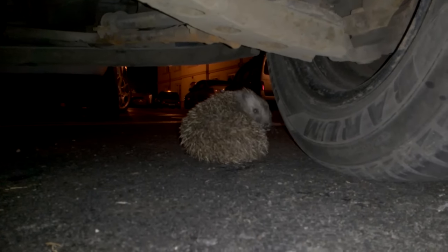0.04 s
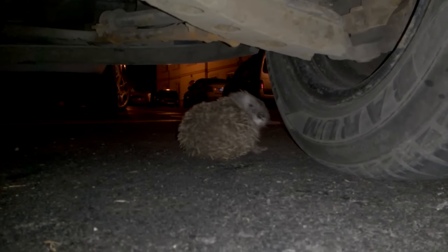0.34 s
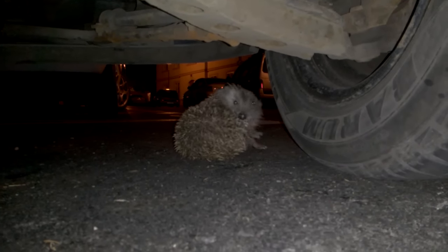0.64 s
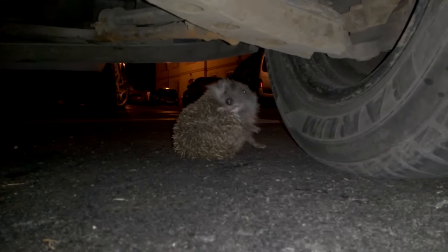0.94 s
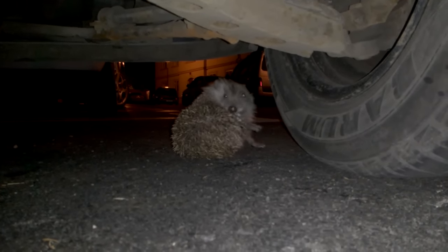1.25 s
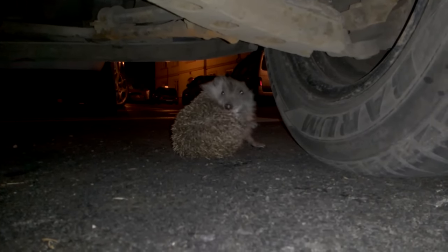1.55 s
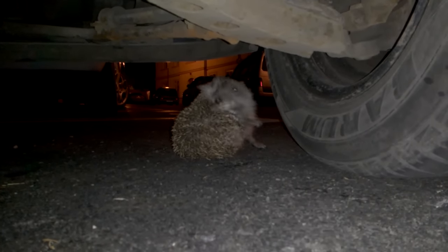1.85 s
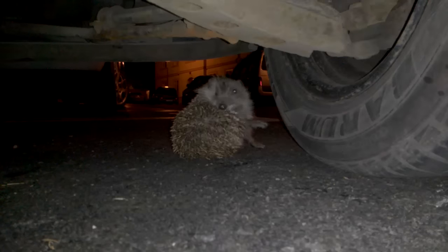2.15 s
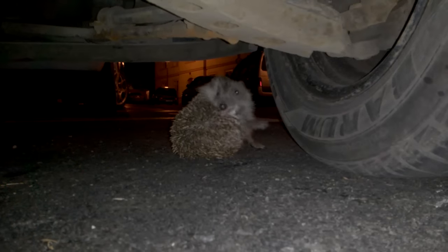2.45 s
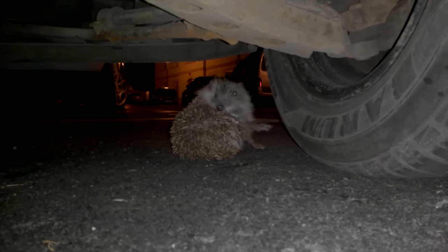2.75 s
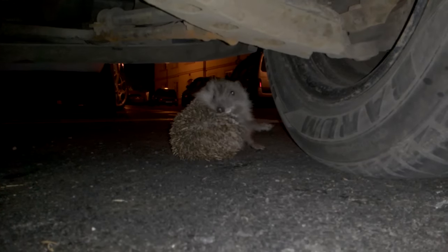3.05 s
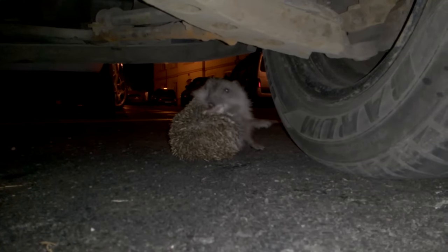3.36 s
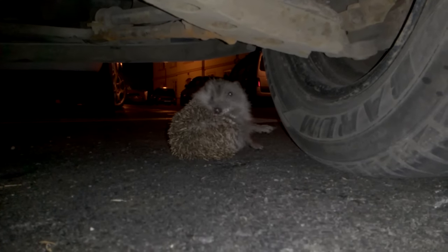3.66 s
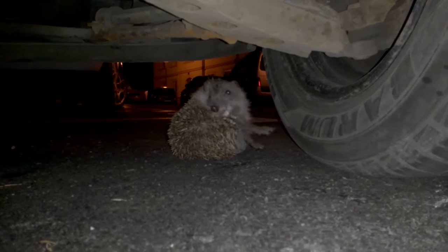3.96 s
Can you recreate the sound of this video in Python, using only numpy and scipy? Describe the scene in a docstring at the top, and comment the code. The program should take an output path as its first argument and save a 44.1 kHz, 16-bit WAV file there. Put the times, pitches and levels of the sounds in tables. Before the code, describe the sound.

A hedgehog smacks its mouth with small wet clicks, over low microphone bumps and rumble.

```python
"""A hedgehog licks and smacks its mouth about twice a second, on asphalt under a parked car at night.
Each wet click rings its tiny mouth for a millisecond and scatters between ground and underbody.
Its tongue squeaks, its spines rustle and its claws scrape. A hand on the microphone adds low bumps,
knocks and rumble, over faint outdoor air, hiss and a far-off hum."""
import sys
import numpy as np
from scipy import signal
from scipy.fft import rfft, irfft
from scipy.io import wavfile
from scipy.ndimage import uniform_filter1d

SR = 44100
rng = np.random.default_rng(int(sys.argv[2]) if len(sys.argv) > 2 else 0)


def waveform_to_disk(signal):
    """Save audio, clipped to [-1, 1], as 16-bit WAV at the path in sys.argv[1]."""
    frames = np.transpose(np.atleast_2d(signal))
    scaled = np.clip(frames, -1, 1) * 32767
    samples = np.round(scaled).astype(np.int16)
    wavfile.write(sys.argv[1], SR, samples)


N = 4 * SR

# Wet clicks. Each row: time in seconds, peak in dB, mouth resonance in Hz, snap trim in dB.
MOUTH_CLICKS = [(0.1186, -42, 5360, -28), (0.2887, -40, 6840, -9), (0.5323, -41.5, 5130, -9),
                (0.656, -43.5, 5690, -26), (0.8068, -44.5, 4830, -12), (0.837, -25.5, 5520, -19),
                (0.9329, -43, 5050, -8), (1.1442, -38, 5670, -27), (1.161, -36, 5420, -32),
                (1.187, -39.5, 6600, -25), (1.2139, -37.5, 5940, -22), (1.306, -42.5, 5750, -29),
                (1.3185, -48, 5700, -24), (1.3357, -35, 5940, -7), (1.3596, -44, 5850, -21),
                (1.667, -48.5, 5540, -28), (1.7892, -33, 5800, -14), (1.8128, -27, 5260, -11),
                (1.834, -35, 5000, -35), (2.1128, -34, 5950, -17), (2.1285, -42, 5360, -26),
                (2.137, -36.5, 5430, -27), (2.2691, -45, 5840.0, -23), (2.2941, -29.5, 5630, -7.5),
                (2.3129, -34, 4580, -37), (2.4476, -43.5, 5450, -12), (2.554, -49, 5400, -15),
                (2.61, -39.5, 5440, -29), (2.7581, -36.5, 6060, -12.5), (2.7776, -30.5, 5350, -9),
                (2.801, -32, 4960, -28), (2.971, -45, 5800, -17), (3.087, -46.5, 5280, -4.5),
                (3.2881, -25.5, 5940, -11.5), (3.308, -39, 5750, -30), (3.5348, -32, 6100, -17),
                (3.6113, -50.5, 5770, -9), (3.6605, -40.5, 5840, -13.5), (3.7888, -37, 4970, -1.5),
                (3.8046, -35.5, 6260, -31), (3.8211, -39, 4400, -22)]
# Hollow pops of the jaw. Each row: time in seconds, peak in dB.
JAW_POPS = [(.838, -55), (1.162, -60.5), (1.214, -54.5), (1.307, -54), (1.337, -59.5), (2.296, -54.5)]
# Thin tongue squeaks. Each row: centre and half length in seconds, level in dB, pitch in Hz.
TONGUE_SQUEAKS = [(0.059, .007, -67, 5180), (1.612, 0.01, -65, 5350), (3.186, 0.0053, -64, 4900),
                  (3.187, 0.007, -63, 8540)]
# Soft licks and brushing spines, then gritty claws.
# Each row: centre and half length in seconds, relative level in dB.
RUSTLES = [(0.105, 0.013, -63), (.205, 0.042, -50.5), (0.265, 0.031, -55), (.34, 0.014, -58.5),
           (.462, .011, -57.5), (0.513, .025, -63.5), (.535, 0.013, -60.5), (0.649, 0.0083, -58.5),
           (0.722, 0.018, -65.5), (0.896, 0.015, -57.5), (0.972, 0.02, -61.5), (1.037, 0.013, -62.5),
           (1.149, 0.024, -65), (1.325, 0.016, -55.5), (1.372, 0.016, -51.5), (1.455, 0.038, -64.5),
           (1.526, 0.0087, -62), (1.61, 0.0043, -65), (1.679, 0.0082, -63.5), (1.847, 0.01, -55.5),
           (1.962, 0.029, -59.5), (2.085, 0.0078, -59.5), (2.132, 0.018, -61.5), (2.325, 0.012, -57),
           (2.41, 0.14, -68), (2.45, 0.0045, -58), (2.812, 0.022, -58), (2.929, 0.031, -64.5),
           (3.135, 0.023, -68), (3.182, 0.012, -64), (3.831, 0.016, -55)]
CLAW_SCRAPES = [(.089, 0.0019, -57), (.118, 0.012, -59.5), (.24, 0.086, -67), (.393, 0.013, -57.5),
                (.463, 0.0098, -60.5), (.52, 0.022, -65.5), (.731, 0.002, -66), (1.345, 0.021, -72)]
# Low bumps on the microphone, then harder knocks on its case.
# Each row: time in seconds, relative level in dB, pitch in Hz.
HAND_BUMPS = [(0.012, -31.5, 89), (0.073, -26, 125), (0.141, -26, 72.4), (0.161, -20.5, 65),
              (0.185, -26, 90), (0.335, -21.5, 72.5), (0.426, -19.5, 109), (0.452, -21.5, 102),
              (0.476, -27, 58.4), (0.513, -22, 83), (0.542, -25, 78), (0.621, -26.5, 124), (0.654, -29, 96),
              (0.735, -19, 83.6), (0.755, -34, 71.6), (1.288, -26, 72), (1.567, -31.5, 87),
              (1.802, -23, 64.5), (2.032, -23.5, 92.5), (2.651, -30, 118), (2.682, -29, 80),
              (2.806, -29.5, 75), (2.828, -26, 70), (2.851, -26, 74), (2.874, -23, 93), (2.955, -23.5, 65),
              (3.017, -30, 74.5), (3.196, -23.5, 64.6), (3.615, -26.5, 79.4), (3.849, -36.5, 76.4),
              (3.888, -26.5, 96), (3.91, -25.5, 119), (3.951, -39, 115), (3.976, -23.5, 100),
              (.919, -29, 105), (1.067, -33.5, 76), (2.326, -36, 68)]
CASE_KNOCKS = [(0.016, -36, 207), (0.042, -41, 270), (0.063, -34.5, 226), (0.091, -38.5, 220),
               (0.256, -33.5, 256), (0.317, -29.5, 264), (0.346, -39, 196), (0.424, -25.5, 194),
               (0.437, -23, 308), (0.45, -23, 267), (0.494, -27, 334), (0.509, -26.5, 276),
               (0.518, -31, 253), (0.544, -31.5, 220), (0.619, -43, 245), (0.632, -31.5, 232),
               (0.731, -31, 230), (0.748, -32, 200), (0.812, -38.5, 201), (1.551, -42, 162),
               (1.792, -31, 220), (2.032, -42, 220), (2.649, -38, 296), (2.663, -30.5, 199),
               (2.688, -37, 218), (2.854, -38.5, 233), (2.875, -36.5, 192), (2.932, -35, 205),
               (2.947, -33, 218), (2.99, -37.5, 208), (3.005, -41.5, 227), (3.887, -28.5, 262),
               (3.907, -29.5, 239), (3.917, -35, 237), (3.951, -31, 213), (3.989, -35.5, 274),
               (.935, -38, 172), (.972, -34, 168), (2.622, -39, 182)]
# The hollow ring of the case. Each row: frequency in Hz, Q, gain in dB.
CASE_MODES = [(251.6, 8.1, -8.5), (390, 12, -9.5), (780, 8.1, 3.5)]
# Rumble faders. Each row: time in seconds, deep band gain in dB, upper band gain in dB.
RUMBLE_FADERS = [(0.04, -46, -49.5), (0.32, -47.5, -55.5), (0.57, -41.5, -49), (1.14, -61.5, -72),
                 (1.33, -55, -65.5), (1.52, -66.5, -76.5), (1.56, -55, -62), (1.74, -51.5, -76),
                 (1.94, -49.5, -61.5), (2.24, -57.5, -71), (2.38, -61, -70), (2.55, -59.5, -84),
                 (2.74, -57.5, -65.5), (2.82, -41.5, -52.5), (3.03, -47, -60.5), (3.16, -47, -63.5),
                 (3.4, -51, -62.5), (3.71, -50, -58.5), (3.95, -39.5, -68)]
# Faders for hiss and hum. Each row: time in seconds, gain in dB.
HISS_FADER = [(0, -79.5), (1.1, -80.5), (1.45, -77), (1.6, -83), (1.77, -84), (1.85, -77.5), (2.15, -75.5),
              (2.68, -80), (2.82, -74.5), (4, -74.5)]
HUM_FADER = [(1.6, -96), (2, -84.5), (4, -90)]
# The tones of the hum, in Hz.
HUM_HZ = [432, 652, 863]
# EQ curves for the noise layers and the stereo side signal. Each row: frequency in Hz, gain in dB.
SNAP_EQ = [(3000, -13), (7200, -14), (8300, 7.5), (9400, 7), (10500, 4), (12000, -8), (14000, -17)]
SMACK_EQ = [(600, -42), (1200, -28), (1900, -22), (2450, -7), (2900, -16.5), (3700, 0), (5400, 2.5),
            (6800, 4), (7600, -0.5), (14000, -23.5)]
RUSTLE_EQ = [(600, -53), (1100, -20), (2300, -19), (2900, -12.5), (3900, -4), (5400, 5.5), (7000, -1),
             (8500, -7), (11000, -24), (14000, -30)]
SCRAPE_EQ = [(700, -8), (1200, -5), (1800, 4.5), (2400, 5.5), (2900, -3.5), (4000, 5), (8000, -42)]
DEEP_RUMBLE_EQ = [(20, -57), (32, -21.5), (52, 3), (75, -4.5), (115, -12), (180, -21.5), (300, -67)]
UPPER_RUMBLE_EQ = [(90, -60), (160, 6), (250, -6.5), (380, -16.5), (520, -27), (750, -36), (1200, -90)]
AIR_EQ = [(100, 13.5), (400, 10), (800, 5.5), (1400, -3.5), (3000, -5), (4200, -5.5), (5400, 5.5),
          (6500, 1), (8000, -0.5), (11000, -3.5), (14000, -11)]
HISS_EQ = [(1000, -2), (5000, -15), (8500, 9.5), (10500, 4.5), (13000, 12)]
SIDE_EQ = [(2000, -47), (3500, -38), (5000, -25.5), (7000, -7), (10000, -3.5), (14000, -7)]

MOUTH_RING_S, JAW_RING_S, JAW_HZ = 0.00023, 0.000291, 2545


def mouth_clicks():
    """Each click rings the mouth and trails three faint, slightly detuned after-ticks; some pop the jaw."""
    out = np.zeros(N)
    for s, db, hz, _ in MOUTH_CLICKS:
        decay_s = MOUTH_RING_S * np.exp(.15 * rng.standard_normal())
        add(out, s - 4 * decay_s, undb(db) * ring(hz, decay_s))
        for delay_s, detune in zip(rng.exponential(.005, size=3), rng.uniform(-1.12, 1, size=3)):
            after_tick = ring(hz * np.exp(.16 * detune), .66 * decay_s)
            add(out, s + delay_s, undb(db - 15) * after_tick)
    for s, db in JAW_POPS:
        add(out, s - 4 * JAW_RING_S, undb(db) * ring(JAW_HZ, JAW_RING_S))
    return out


def ring(hz, decay_s, fall_per_s=110):
    """A cavity rings for a few cycles, falling in pitch and peaking four decay times in."""
    t = np.arange(400) / SR
    pitch = hz * np.exp(-fall_per_s * rng.uniform(.5, 1.5) * (t - 4 * decay_s))
    envelope = (t / decay_s / 4) ** 4 * np.exp(4 - t / decay_s)
    return envelope * np.sin(2 * np.pi * (np.cumsum(pitch) / SR + rng.random()))


def wet_smacks():
    """The saliva film bursts on each click: a bright snap, then a softer wet crackle."""
    snap = bursts([(s, db + trim) for s, db, _, trim in MOUTH_CLICKS], SNAP_EQ, decay_s=.0027)
    smack = bursts([(s, db) for s, db, _, _ in MOUTH_CLICKS], SMACK_EQ, decay_s=.008)
    return undb(-8) * snap + undb(-20) * smack


def tongue_squeaks(width_hz=550):
    """The wet tongue sticks and slips: a narrow rasp around one pitch."""
    out, t = np.zeros(N), np.arange(N) / SR
    rasp = wander(2 * width_hz) + 1j * wander(2 * width_hz)
    for s, half_s, db, hz in TONGUE_SQUEAKS:
        swell = undb(db) * np.exp(-.5 * ((t - s) / half_s) ** 2)
        out += swell * (rasp * np.exp(2j * np.pi * hz * t)).real
    return out


def rustle():
    """Tongue and spines brush in a fine, bright grain."""
    return undb(-1.5) * grains(RUSTLES, RUSTLE_EQ, per_s=2500)


def claw_scrapes():
    """Claws drag over asphalt in a coarser grit."""
    return undb(-4) * grains(CLAW_SCRAPES, SCRAPE_EQ, per_s=600)


def underbody(x, echoes_per_s=3500, near_t60_s=.042, tail_t60_s=.31):
    """Close reflections off asphalt, tyre and car floor, then a weak diffuse tail."""
    t = np.arange(SR // 2) / SR
    echoes = rng.standard_normal(len(t)) * (rng.random(len(t)) < echoes_per_s / SR)
    near = echoes * (t > .0008) * undb(-60 * t / near_t60_s)
    tail = rng.standard_normal(len(t)) * (t > .004) * undb(-60 * t / tail_t60_s)
    response = (undb(-8) * unit(near) + undb(-16.5) * unit(tail)) / np.sqrt(len(t))
    return signal.fftconvolve(x, response)[:N]


def hand_rumble():
    """The hand on the microphone rumbles: a deep bed under a fluttering upper band."""
    deep = noise(DEEP_RUMBLE_EQ) * fader(RUMBLE_FADERS, column=1) * undb(7.5)
    upper = noise(UPPER_RUMBLE_EQ) * fader(RUMBLE_FADERS, column=2) * undb(2 + 2.5 * wander(40))
    return deep + upper


def hand_bumps():
    """The hand bumps the microphone; harder knocks ring its hollow case."""
    knocks = thuds(CASE_KNOCKS, width_octaves=.51)
    case = sum(undb(db) * signal.lfilter(*signal.iirpeak(hz, q, fs=SR), knocks)
               for hz, q, db in CASE_MODES)
    return undb(1) * (thuds(HAND_BUMPS, width_octaves=.55) + knocks + case)


def night_air():
    """Still outdoor air, gently wavering, and the microphone's hiss."""
    air = undb(-70 + wander(7.3)) * noise(AIR_EQ)
    hiss = undb(1.5) * fader(HISS_FADER) * noise(HISS_EQ)
    return air + hiss


def distant_hum():
    """Faint far-off tones, each wavering in level."""
    t = np.arange(N) / SR
    return fader(HUM_FADER) * sum(wander(20) * np.sin(2 * np.pi * hz * t) for hz in HUM_HZ)


def bursts(hits, eq, decay_s):
    """Noise bursts with an instant attack and a fast decay."""
    envelope, fade = np.zeros(N), np.exp(-np.arange(SR // 10) / SR / decay_s)
    for s, db in hits:
        add(envelope, s - 2 * MOUTH_RING_S, undb(db) * fade)
    white = rng.standard_normal(N)
    return equalise(envelope * white, eq) / np.std(equalise(white, eq))


def grains(swells, eq, per_s, spread_db=3.5):
    """Swells of dense, uneven little ticks."""
    t = np.arange(N) / SR
    power = sum(undb(db) ** 2 * np.exp(-((t - s) / half_s) ** 2) for s, half_s, db in swells)
    ticks = (rng.random(N) < per_s / SR) * rng.choice([-1, 1], N)
    accents = undb(spread_db * rng.exponential(size=N).clip(0, 4))
    return np.sqrt(power) * unit(equalise(ticks * accents, eq))


def thuds(hits, width_octaves, size=8192):
    """Soft pushes of a cycle or two, each around its own pitch."""
    out, f = np.zeros(N), np.maximum(np.fft.rfftfreq(size, 1 / SR), 1)
    for s, db, hz in hits:
        spectrum = np.exp(-.5 * (np.log2(f / hz) / width_octaves) ** 2) / f
        pulse = signal.hilbert(np.fft.fftshift(irfft(spectrum)))
        random_phase = np.exp(2j * np.pi * rng.random())
        thud = (pulse / abs(pulse).max() * random_phase).real
        start_s = s - size / 2 / SR
        add(out, start_s, undb(db) * thud[max(int(-start_s * SR), 0):])
    return out


def undb(db):
    """Decibels to gain."""
    return 10 ** (np.asarray(db) / 20)


def unit(x):
    """Scale to rms 1."""
    return x / np.sqrt(np.mean(x ** 2))


def equalise(x, eq):
    """Shape a sound with an EQ curve."""
    hz, db = np.array(eq, float).T
    f = np.maximum(np.fft.rfftfreq(len(x), 1 / SR), 1)
    return irfft(rfft(x) * undb(np.interp(np.log(f), np.log(hz), db)), len(x))


def noise(eq):
    """Coloured noise of rms 1."""
    return unit(equalise(rng.standard_normal(N), eq))


def fader(rows, column=1):
    """Gain that rides through timed dB points."""
    rows = np.array(rows, float)
    return undb(np.interp(np.arange(N) / SR, rows[:, 0], rows[:, column]))


def wander(per_s):
    """Smooth random drift of rms 1."""
    hold = int(SR / per_s)
    steps = np.repeat(rng.standard_normal(N // hold + 1), hold)
    return unit(uniform_filter1d(uniform_filter1d(steps, hold), hold)[:N])


def add(out, start_s, x):
    """Mix x in at a time."""
    i = max(int(start_s * SR), 0)
    out[i:i + len(x)] += x[:max(N - i, 0)]


def scene():
    """The hedgehog dead centre; reflections and air spread wide in the treble only."""
    hedgehog = mouth_clicks() + wet_smacks() + tongue_squeaks() + rustle() + claw_scrapes()
    mid = hedgehog + underbody(hedgehog) + night_air() + distant_hum() + hand_rumble() + hand_bumps()
    side = equalise(underbody(hedgehog) + night_air(), SIDE_EQ)
    return np.array([mid + side, mid - side])


def record(dry, top_hz=14200):
    """A steep low-pass takes off the very top."""
    return signal.sosfilt(signal.ellip(10, .2, 70, top_hz, fs=SR, output="sos"), dry)


dry = scene()
out = record(dry)
waveform_to_disk(out)
```